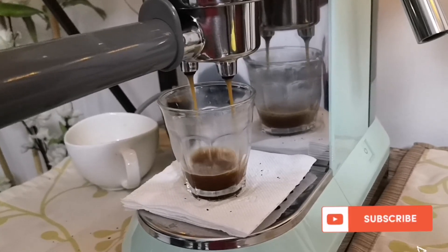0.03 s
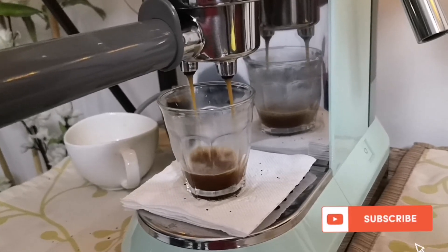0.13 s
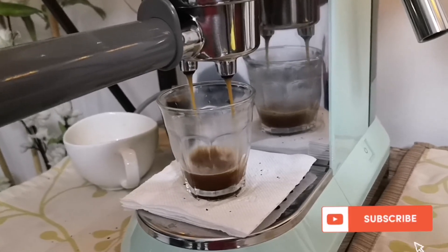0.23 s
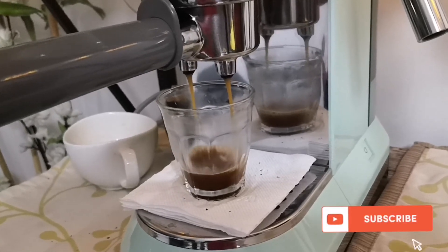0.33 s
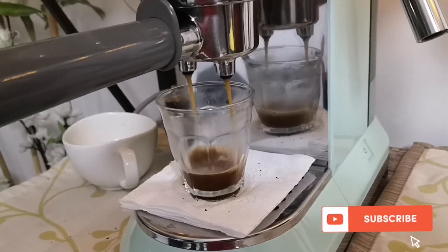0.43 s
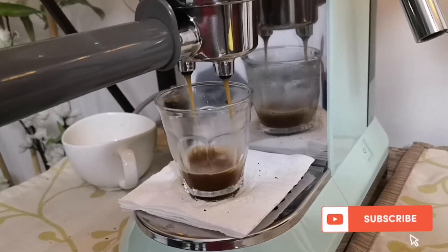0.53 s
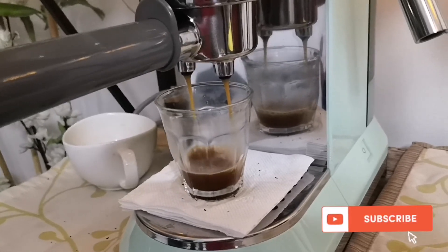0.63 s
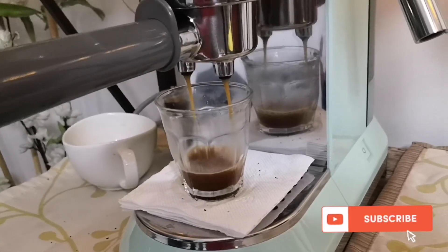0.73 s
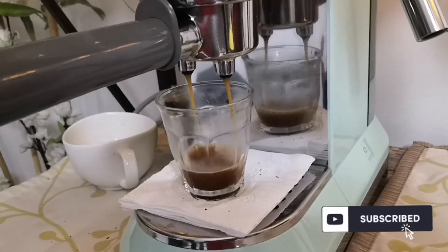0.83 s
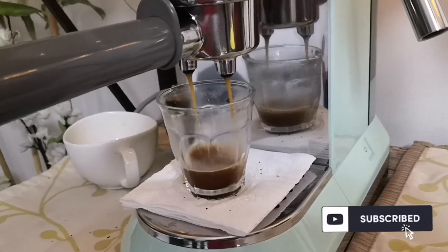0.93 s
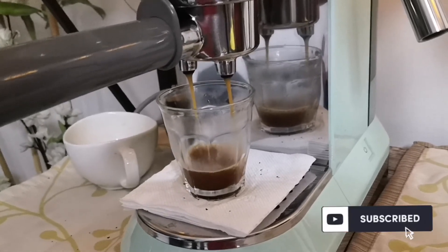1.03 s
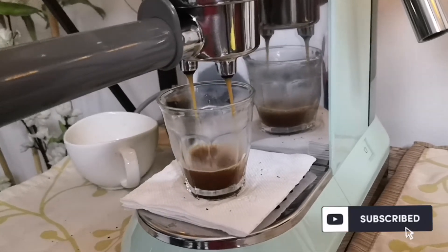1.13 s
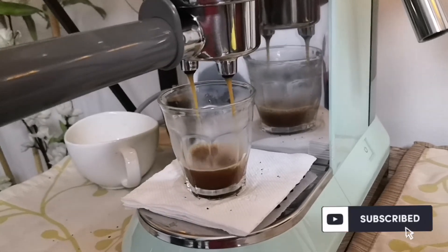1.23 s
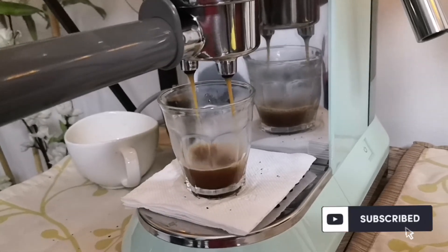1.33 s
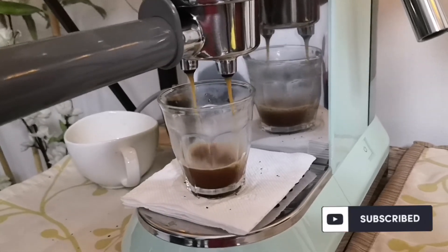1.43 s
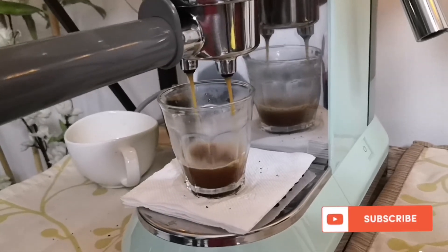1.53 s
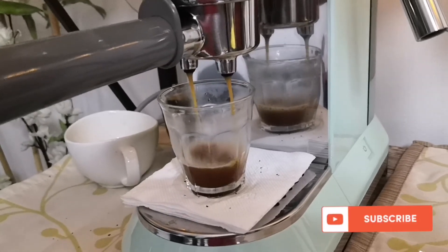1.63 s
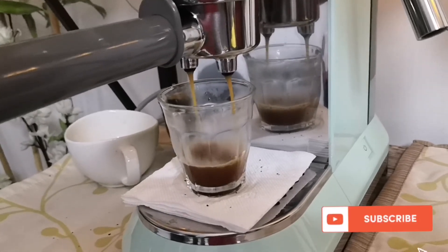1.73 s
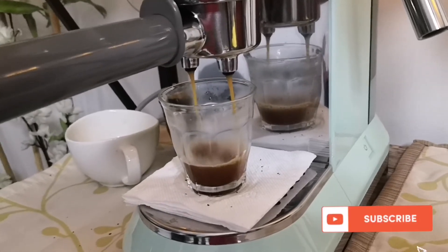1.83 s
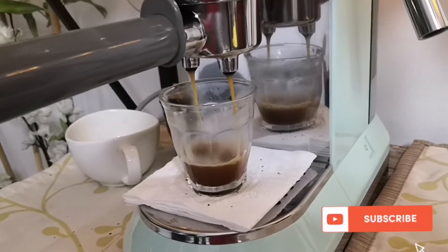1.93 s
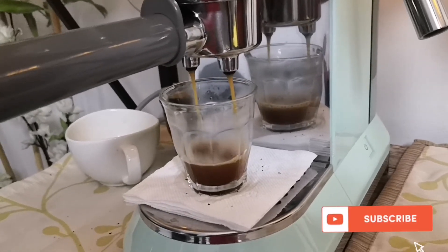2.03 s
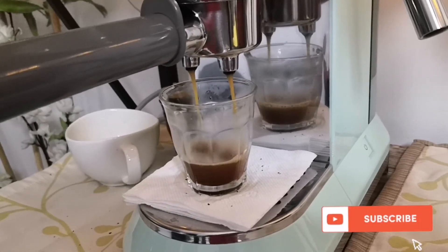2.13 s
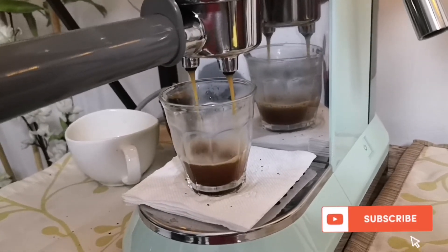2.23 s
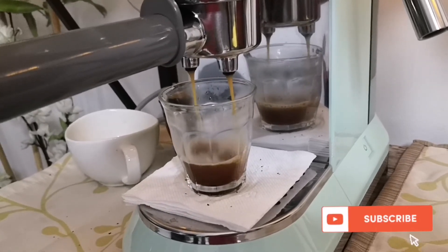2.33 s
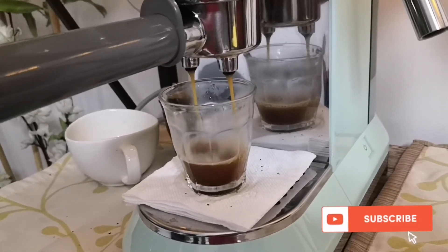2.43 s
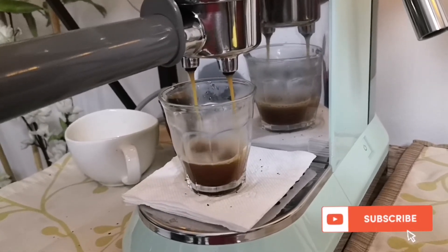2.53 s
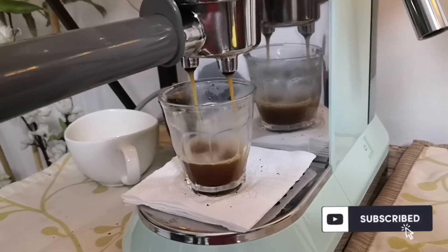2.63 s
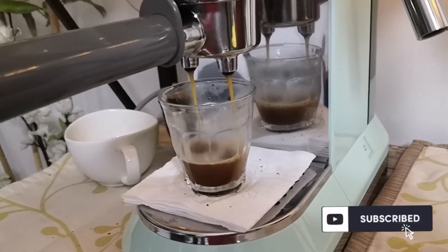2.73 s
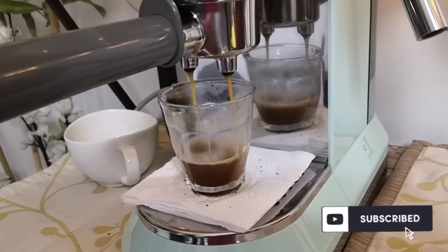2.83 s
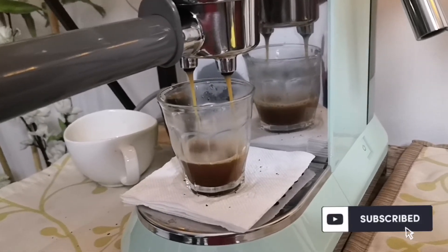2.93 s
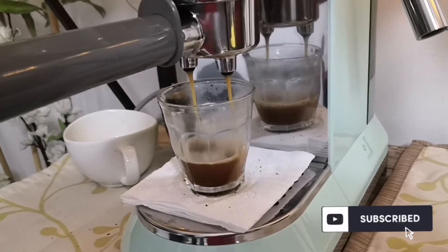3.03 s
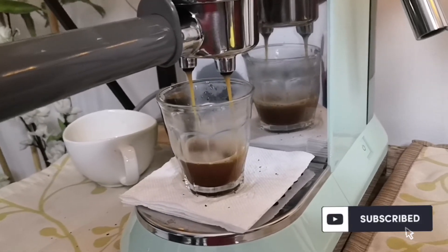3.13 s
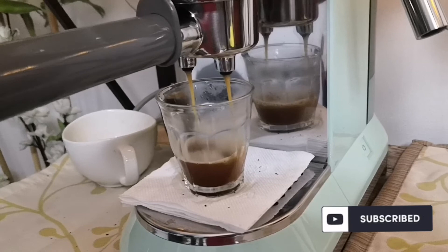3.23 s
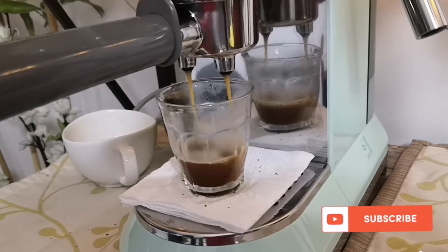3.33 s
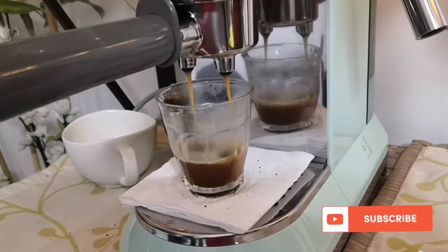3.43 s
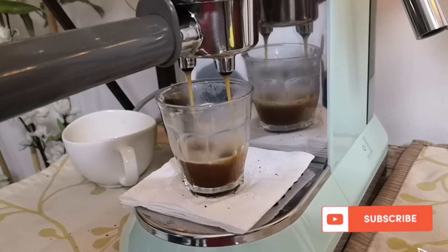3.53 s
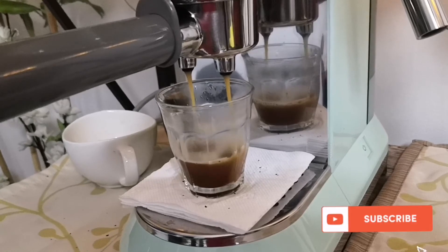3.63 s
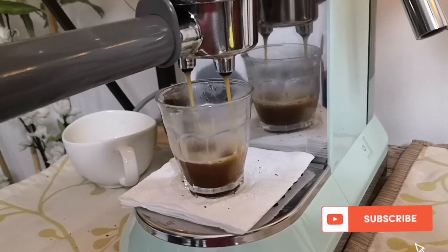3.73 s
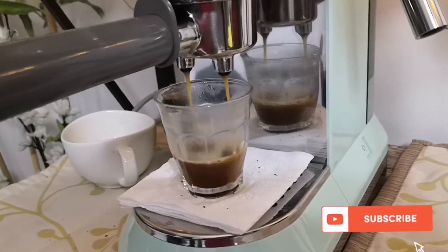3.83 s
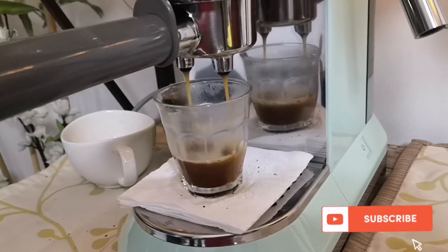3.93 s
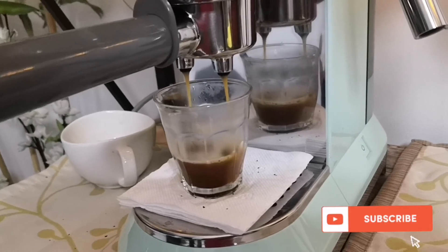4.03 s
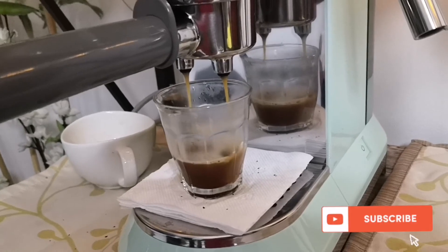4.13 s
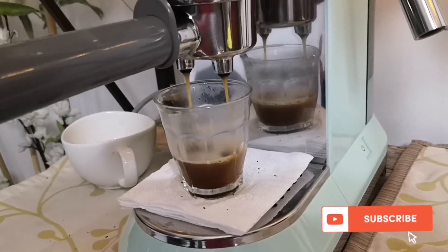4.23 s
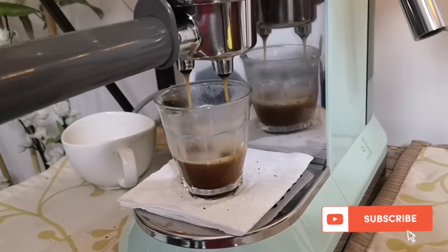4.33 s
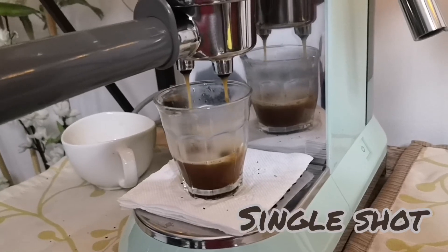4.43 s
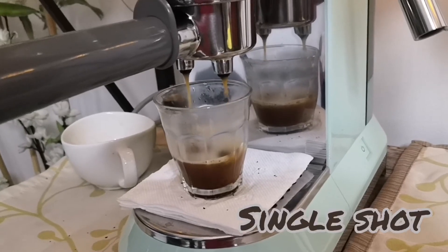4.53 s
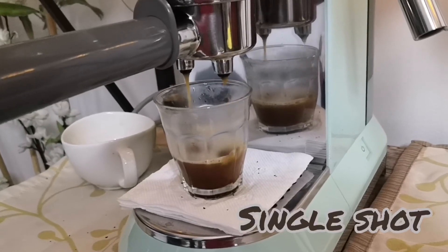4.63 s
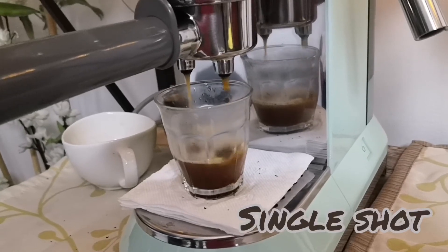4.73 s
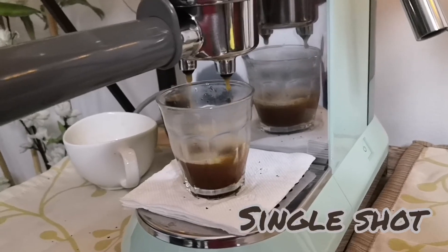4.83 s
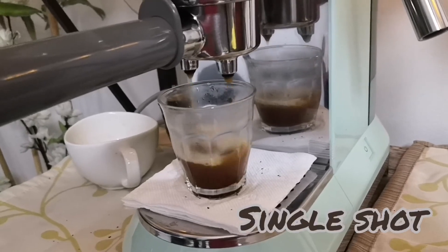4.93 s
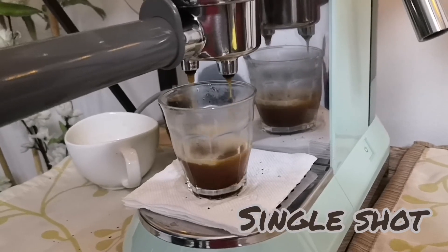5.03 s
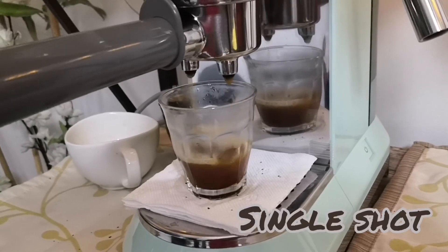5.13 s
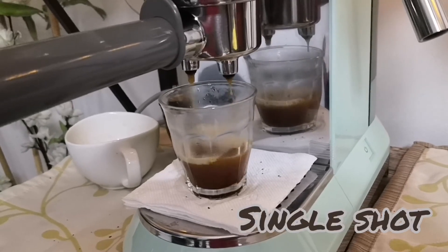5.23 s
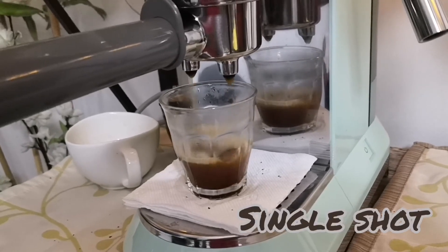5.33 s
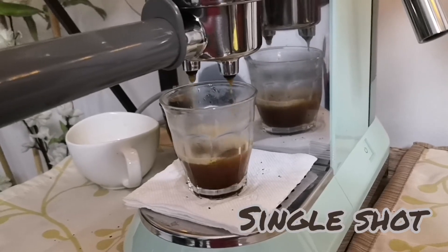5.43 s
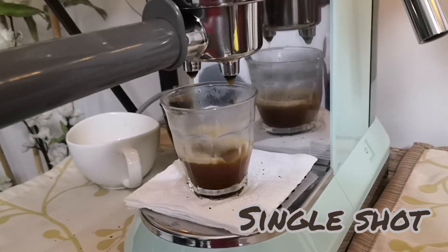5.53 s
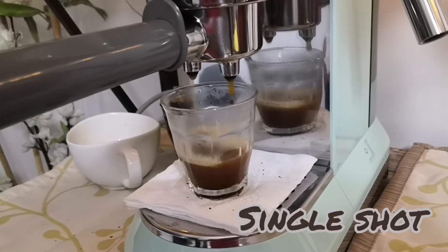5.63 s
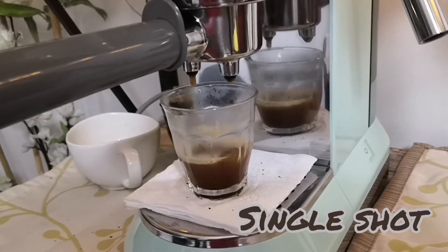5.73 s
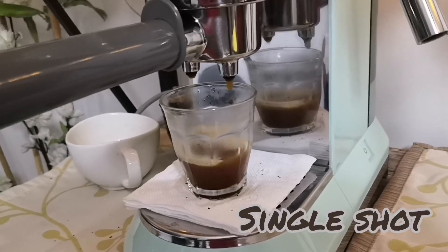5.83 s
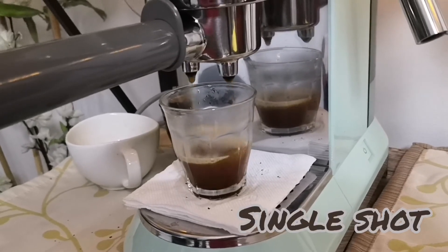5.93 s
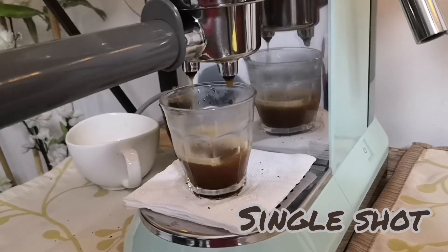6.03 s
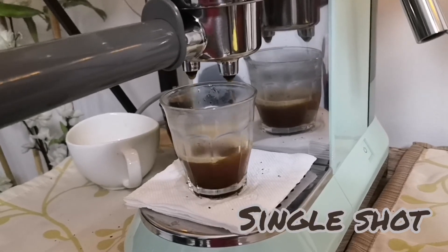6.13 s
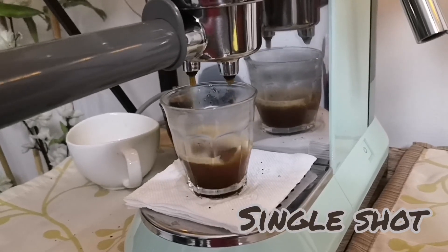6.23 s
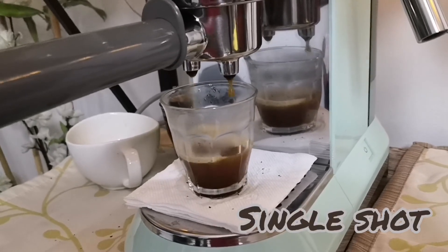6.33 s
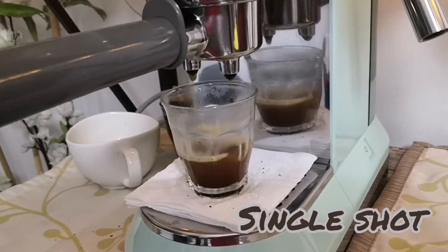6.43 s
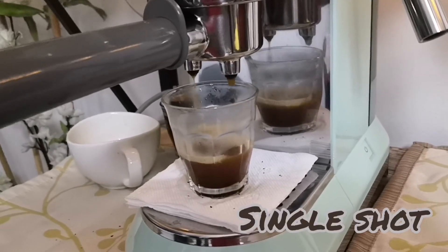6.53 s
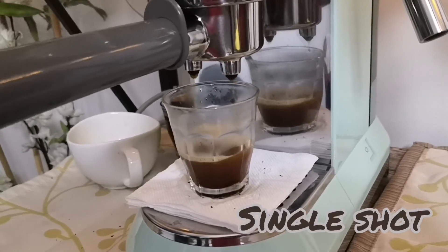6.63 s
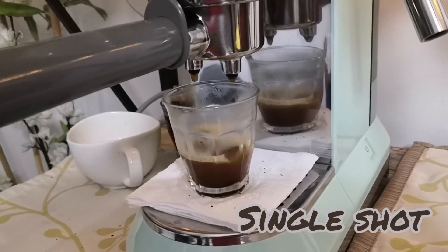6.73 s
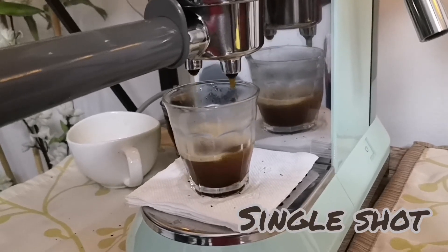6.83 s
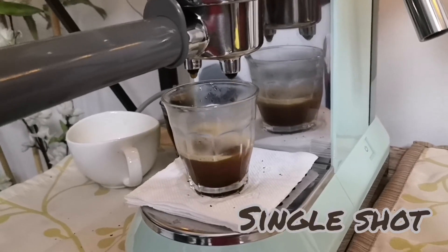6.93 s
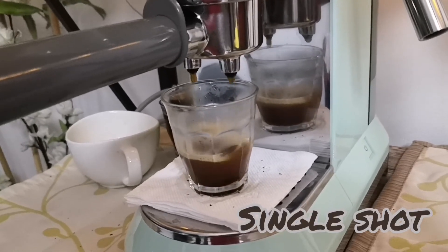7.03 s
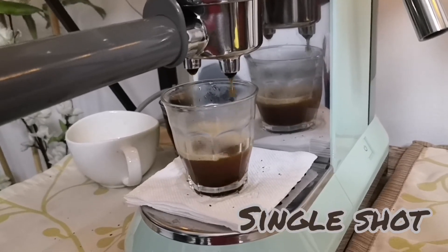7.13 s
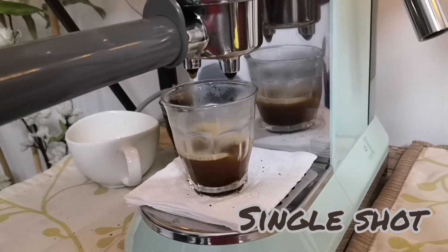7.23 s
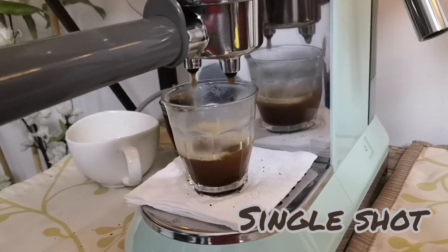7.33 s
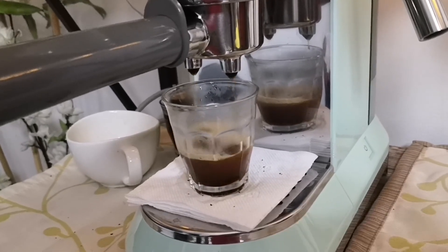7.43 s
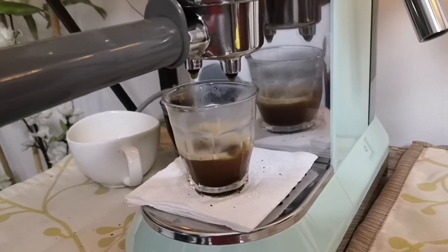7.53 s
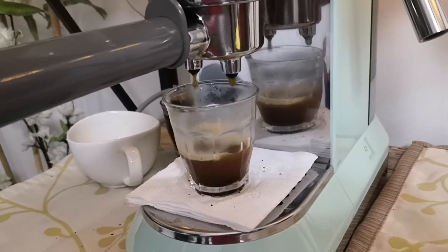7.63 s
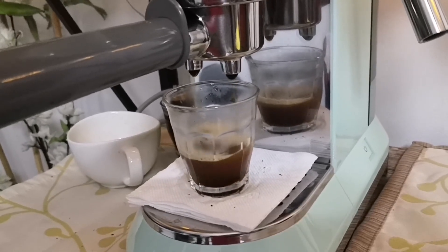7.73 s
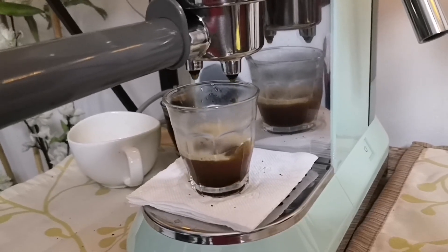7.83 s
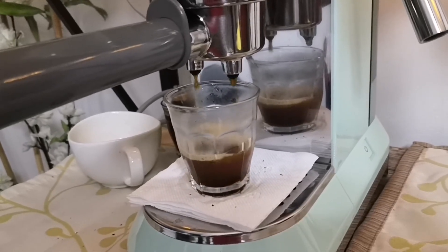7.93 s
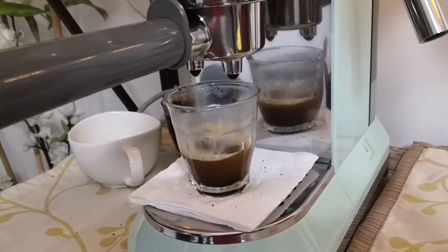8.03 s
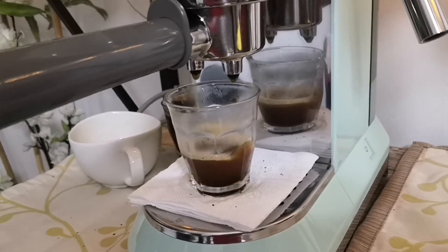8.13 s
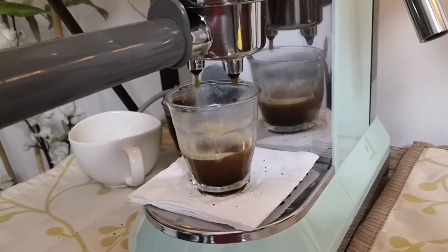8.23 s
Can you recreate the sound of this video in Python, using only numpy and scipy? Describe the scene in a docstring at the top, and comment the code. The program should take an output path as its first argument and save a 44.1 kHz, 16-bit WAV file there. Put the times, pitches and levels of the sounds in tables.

```python
"""An espresso machine pulls a shot in a kitchen: its vibrating pump hums and buzzes at the mains rate
as sums of stroke overtones, with noise for rattle and rushing water, then cuts out with a soft thump.
Coffee sputters in small wet ticks as the flow dies: ringing bubbles, splashes and dry cracks in a room tail.
Something is handled with soft rustles of shaped noise and brief squeaks of narrow-band noise.
The room rumbles quietly underneath as filtered noise; a stereo microphone with two ringing ports hears it all."""
import sys
import numpy as np
from scipy import signal
from scipy.fft import rfft, irfft, next_fast_len
from scipy.io import wavfile
from scipy.ndimage import uniform_filter1d, map_coordinates

SR = 44100
rng = np.random.default_rng(int(sys.argv[2]) if len(sys.argv) > 2 else 0)


def pcm_store(signal):
    """Save signal as 16-bit PCM."""
    levels = np.round(np.clip(np.atleast_2d(signal), -1, 1) * 32767)
    wavfile.write(sys.argv[1], SR, levels.astype(np.int16).T)


N = 365148
TIME = np.arange(N) / SR
MAINS_HZ = 60.06
STROKE_PHASE = 0.2  # cycles
STOP_S = 3.145  # the pump is switched off


def amp(db):
    """Decibels to gain."""
    return 10 ** (np.asarray(db) / 20)


def unit(x):
    """Scaled to rms 1."""
    return x / np.sqrt(np.mean(x ** 2) + 1e-20)


def along(points, hz):
    """(Hz, value) points read on a log frequency axis."""
    point_hz, value = np.transpose(points)
    return np.interp(np.log(hz + 1), np.log(point_hz), value)


def wobble(rate):
    """A smooth random curve with `rate` knots a second."""
    steps = np.arange(0, TIME[-1] * rate + 1, 1 / 10)
    curve = map_coordinates(rng.standard_normal(4096), [steps], mode="wrap")
    return np.interp(TIME * rate, steps, curve)


def filtered(x, response):
    """x times a response of frequency."""
    n = x.shape[-1]
    padded = next_fast_len(n + SR // 10)
    spectrum = rfft(x, padded) * response(np.fft.rfftfreq(padded, 1 / SR))
    return irfft(spectrum, padded)[..., :n]


def resonance(f, hz, width):
    """One causal resonance with peak gain 1; pitch and width in Hz."""
    return 1j * f * width / (hz * hz - f * f + 1j * f * width)


# Likeness of the left and right channels in diffuse sound: pitch_hz, likeness (0-1)
LEFT_RIGHT_LIKENESS = [(60, 0.99), (130, 1), (290, 0.77), (600, 0), (15000, 0.01)]


def noise(spectrum):
    """Diffuse stereo noise of rms 1, alike in the bass: mid and side share the power by likeness."""
    def mid_and_side(f):
        turn = np.arccos(np.clip(along(LEFT_RIGHT_LIKENESS, f), -1, 1)) / 2
        return amp(along(spectrum, f)) * [np.cos(turn), np.sin(turn)]

    mid, side = filtered(rng.standard_normal((2, N)), mid_and_side)
    return unit(np.array([mid + side, mid - side]))


def add(track, s, sound):
    """Mix a sound into a track at time s."""
    part = track[..., round(s * SR):][..., :sound.shape[-1]]
    part += sound[..., :part.shape[-1]]


def swell(start, length, rise, t60, linger_db=-13, linger_t60=0.86):
    """A smooth rise, a hold, a quick fade and a weaker one that lingers in the room; times in s."""
    t = TIME - start
    after = np.clip(t - length, 0, 2)
    fade_db = np.maximum(-60 * after / t60, linger_db - 60 * after / linger_t60)
    return (1 + np.tanh(2 * t / rise - 1 / 2)) / 2 * amp(fade_db)


# Colour of the room's rumble and faint hiss: pitch_hz, relative level_db (per Hz)
KITCHEN_COLOUR = [(22, -9), (36, -8), (78, -2), (100, -19.5), (135, -1.5), (220, -5.5), (460, -17.5),
                  (700, -17.5), (960, -14), (1250, -17), (2500, -17.5), (3300, -29), (7500, -35),
                  (11000, -47)]


def kitchen(floor_db=-54.0, settle_db=-1.22):
    """The room's diffuse rumble and faint hiss, easing slightly in level from 5.7 to 6.5 s."""
    drift_db = 0.4 * wobble(3)
    settling_db = np.interp(TIME, [5.7, 6.5], [0, settle_db])
    return amp(floor_db + settling_db + drift_db) * noise(KITCHEN_COLOUR)


def patches(x, depth_db):
    """Random swells of colour, a few hundred hertz wide and some tens of milliseconds long."""
    z = signal.stft(x, nperseg=512)[2]
    field = rng.standard_normal(z.shape[1:])
    for _ in range(2):
        across_pitch = uniform_filter1d(field, size=5, axis=0)
        field = uniform_filter1d(across_pitch, size=6, axis=1)
    return unit(signal.istft(z * amp(depth_db * unit(field)), nperseg=512)[1][:, :N])


def stroke(start, length, rise_share=0.16, t60=0.41, arch_db_per_s=35):
    """One rub: it presses hardest half way, the more so the longer it lasts."""
    way = np.clip((TIME - start) / length, 0, 1)
    arch_db = arch_db_per_s * length * (1 / 2 - (2 * way - 1) ** 2)
    return swell(start, length, rise_share * length, t60) * amp(arch_db)


# Soft rubs, levels before the arch of each rub and the flutter:
# start_s, length_s, body_level_db, hiss_level_db, air_level_db
RUBS = [(0.047, 0.18, -58.5, -62.5, -91), (0.635, 0.011, -64, -49.5, -76),
        (0.953, 0.051, -52, -53.5, -69.5), (1.21, 0.3, -60, -66.5, -89), (1.815, 0.014, -55, -57, -62.5),
        (3.098, 0.027, -58, -56.5, -70), (4.104, 0.056, -64, -62, -65), (4.2, 0.2, -68, -69, -81),
        (4.707, 0.077, -61.5, -59, -73), (4.828, 0.027, -58.5, -75, -88), (4.882, 0.016, -54.5, -51, -73),
        (4.933, 0.012, -53.5, -53.5, -75), (5.045, 0.083, -67.5, -67.5, -70),
        (5.253, 0.093, -49.5, -54, -60.5), (5.45, 0.079, -59, -62.5, -87), (5.527, 0.12, -54.5, -53.5, -60),
        (5.647, 0.017, -48.5, -56.5, -62), (5.709, 0.011, -56, -54.5, -76), (5.797, 0.008, -71, -57.5, -67),
        (5.842, 0.14, -57.5, -56.5, -59.5), (6.341, 0.01, -74, -65.5, -73), (6.374, 0.081, -59, -55.5, -59),
        (6.527, 0.016, -55.5, -55, -65), (7.126, 0.13, -69, -74.5, -92), (7.457, 0.026, -61.5, -62, -77),
        (7.598, 0.017, -51, -51.5, -63), (8.119, 0.0088, -69, -61.5, -82), (8.175, 0.014, -59, -65, -80)]
# Colours of the rubs' three parts, low to high: pitch_hz, relative level_db (per Hz)
RUB_BODY = [(60, -18), (170, 5), (450, -10.5), (940, -10.5), (1600, -5), (2300, -2), (3300, -3.5),
            (5000, -9.5), (9000, -31.5)]
RUB_HISS = [(1500, -37), (3500, -18), (5000, 0), (6600, -1), (7600, 4), (8400, -9), (10000, -11),
            (15000, -59)]
RUB_AIR = [(5000, -31), (8000, 2.5), (9500, 3.5), (11500, -4), (15000, -13)]


def rustles(grain_db=1.1, flutter_db=1.55, patchy_db=2.3):
    """Soft, grainy rubs of body, hiss and air noise; long ones swell in, short ones start abruptly."""
    power = np.zeros((3, N))
    for start, length, *levels_db in RUBS:
        power += np.outer(amp(levels_db), stroke(start, length)) ** 2
    rub = np.zeros((2, N))
    for level, colour in zip(np.sqrt(power), (RUB_BODY, RUB_HISS, RUB_AIR)):
        rub += level * patches(noise(colour), patchy_db)
    return rub * amp(grain_db * wobble(350) + flutter_db * wobble(50))


# Squeaks within the rustles: start_s, pitch_hz, level_db, length_s (before the fade), width (share of pitch)
SQUEAK_EVENTS = [(0.901, 3200, -56, 0.025, .012), (0.96, 5920, -52, 0.07, 0.11),
                 (1.816, 5704, -55, 0.045, 0.067), (3.096, 4950, -53.5, 0.044, 0.19),
                 (3.355, 3680, -59, 0.089, 0.068), (3.627, 4730, -51.5, 0.012, 0.21),
                 (4.882, 9100, -52, 0.0078, .1), (5.3, 2550, -67, .3, 0.046),
                 (5.71, 8440, -54, 0.011, 0.13), (6.524, 7850, -50.5, 0.033, 0.19),
                 (7.569, 5050, -54.5, 0.066, 0.065)]


def squeaks():
    """Brief whistles, some pure, some coarse: narrow-band noise keeps its wavering pitch, not its level."""
    out = np.zeros((2, N))
    for start, hz, db, length, width in SQUEAK_EVENTS:
        band = filtered(rng.standard_normal((2, SR // 2)), lambda f: resonance(f, hz, width * hz) ** 2)
        level_tone = np.cos(np.angle(signal.hilbert(band)))
        whistle = np.zeros((2, N))
        add(whistle, start - 0.01, unit(level_tone))
        out += amp(db) * whistle * swell(start, length, rise=0.0026, t60=0.22, linger_db=-17.5)
    return out


def bubble(hz, t60=0.017, attack=0.00079, glide_per_s=5, splash_db=-9, splash_t60=0.015, splash_width_hz=2300):
    """A drop's broad splash opens a small cavity that rings briefly, rising in pitch; the ring has peak 1."""
    t = np.arange(SR // 25) / SR
    life = t60 * np.exp(0.28 * rng.standard_normal())
    onset = (1 - np.exp(-t / attack)) ** 2
    ring = np.sin(2 * np.pi * hz * t * (1 + glide_per_s * t / 2)) * onset * amp(-60 * t / life)
    splash = unit(filtered(rng.standard_normal(len(t)), lambda f: resonance(f, hz, splash_width_hz) ** 2))
    splash_fade = np.sqrt(onset) * amp(splash_db - 60 * t / splash_t60)
    return ring / np.abs(ring).max() + splash * splash_fade


# Colour of the dry cracks: pitch_hz, relative level_db (per Hz)
SNAP_COLOUR = [(500, -24), (1000, 7), (2600, -3), (3600, 1.5), (7400, 2), (8600, -12), (13000, -14)]


def snap(hz, width_hz=2300, broad=0.21, t60=0.014, attack=0.0002):
    """A film of coffee bursts: a dry crack of noise, strengthened around its own pitch."""
    t = np.arange(SR // 25) / SR

    def colour(f):
        return amp(along(SNAP_COLOUR, f)) * (broad + abs(resonance(f, hz, width_hz)) ** 2)

    burst = (1 - np.exp(-t / attack)) * amp(-60 * t / t60)
    return unit(filtered(rng.standard_normal(len(t)), colour)) * burst / burst.max()


# Decay of the kitchen's echo: pitch_hz, t60_s
ROOM_DECAY = [(200, 0.14), (2000, 0.33), (8000, 0.26), (15000, 0.011)]


def room_tail():
    """A stereo room answer, left energy 1: decaying noise whose highest treble dies first."""
    hz, t, z = signal.stft(rng.standard_normal((2, SR // 3)), SR, nperseg=256)
    decay_db = -60 * t / along(ROOM_DECAY, hz)[:, None]
    tail = signal.istft(z * amp(decay_db), SR, nperseg=256)[1]
    return tail / np.linalg.norm(tail[0])


def tick(ring, crack, ring_wet_db=-8, crack_wet_db=-10, lag_s=0.00064, pan_db=6.5, snap_left_db=2):
    """One wet tick in the room: its crack lies a little to the left, its ring on the right."""
    sent = amp(ring_wet_db) * ring + amp(crack_wet_db) * crack
    sound = signal.fftconvolve(sent[None], room_tail(), axes=1)
    add(sound[0], 0, amp(-pan_db) * ring + amp(snap_left_db) * crack)
    add(sound[1], lag_s, amp(pan_db / 2) * ring + crack)
    return sound


# The clearest wet ticks, levels before panning: start_s, bubble_peak_db, snap_level_db, snap_pitch_hz
CLEAR_TICKS = [(0.103, -48, -39.5, 6160), (0.2212, -54, -42, 6030), (0.2391, -51, -36, 5800),
               (0.625, -54, -46, 5900), (0.6712, -31.5, -46, 6050), (0.9153, -48, -39.5, 3570),
               (1.9914, -29.5, -51, 6200), (2.0572, -46, -40, 3450), (2.0819, -36, -41, 4540),
               (2.1328, -41, -34, 5700), (2.194, -29.5, -52, 7380), (2.5825, -32, -37.5, 3400),
               (2.7825, -40, -40.5, 6400), (2.7951, -35, -60, 4000), (2.9125, -31, -41.5, 3940),
               (2.9477, -32, -44, 4690), (3.0076, -31.5, -58, 3040), (3.0184, -34.5, -53, 3360),
               (3.0657, -31.5, -41.5, 4740), (3.087, -32, -56, 4930), (3.11, -33, -50, 4690),
               (3.1448, -34.5, -56, 4830), (3.2882, -43.5, -46.5, 6900), (3.3277, -41, -55, 7650),
               (3.3578, -39, -57, 3710), (3.4088, -36, -53, 3700), (3.442, -28.5, -43.5, 3800),
               (3.564, -38.5, -57, 4720), (3.608, -39, -57, 4750), (3.7225, -40, -51, 6020),
               (3.771, -43, -50.5, 7240), (3.8045, -41, -61, 7790), (3.8528, -41, -43.5, 3240),
               (3.8586, -37.5, -42, 5650), (3.913, -44, -49.5, 7450), (3.9332, -39, -44.5, 3440),
               (4.1418, -39.5, -63, 7510), (4.235, -52, -51, 6300), (4.2835, -40, -63, 7530),
               (4.3235, -47, -55, 3500), (4.37, -44, -70, 3520), (4.4776, -37, -57, 3070),
               (4.619, -40, -56, 3080), (4.6815, -44, -59, 3140)]
# The bubbles' central pitch drifts with the flow into the glass: time_s, pitch_hz
BUBBLE_DRIFT = [(.67, 1920), (2.15, 1906), (2.6, 1800), (3.4, 1797), (3.75, 1776), (4.5, 1860)]


def coffee(count=44, spit_bubble_db=-49, spit_snap_db=-57, drip_bubble_db=-55.5, drip_snap_db=-73,
           range_db=11, snap_hz=6200, pitch_scatter=0.029):
    """Clear ticks, faint spits in step with the piston, and a faint dribble as the flow dies."""
    ticks = list(CLEAR_TICKS)
    for spit, drip, size in rng.random((count, 3)):
        cycle_number = np.floor(STOP_S * spit * MAINS_HZ)
        spit_s = (cycle_number + STROKE_PHASE / 2) / MAINS_HZ
        drip_s = 2.85 + 1.55 * drip
        louder_db = range_db * size
        ticks.append((spit_s, spit_bubble_db, spit_snap_db + louder_db, snap_hz))
        ticks.append((drip_s, drip_bubble_db + louder_db, drip_snap_db + louder_db, snap_hz))
    out = np.zeros((2, N))
    for s, bubble_db, snap_db, crack_hz in ticks:
        central_hz = np.interp(s, *np.transpose(BUBBLE_DRIFT))
        hz = central_hz * (1 + pitch_scatter * rng.standard_normal())
        add(out, s, tick(amp(bubble_db) * bubble(hz), amp(snap_db) * snap(crack_hz)))
    return out


# The machine's body has its own mode
BODY_MODE_HZ, BODY_MODE_T60_S = 245, 0.33


def thump(rest_s=3.204, level_db=-37.5, t60=0.06):
    """The piston comes to rest with a soft knock: a decaying tone at the body's mode."""
    t = np.maximum(TIME - rest_s, 0)
    onset = np.tanh(BODY_MODE_HZ * t)
    return amp(level_db - 60 * t / t60) * np.sin(2 * np.pi * BODY_MODE_HZ * t) * onset


# The pump's effort while it runs: time_s, level_db
PUMP_EFFORT = [(0, -1), (1.0, -1.5), (1.7, -2), (2.4, -0.5), (3.1, 0)]


def running(t60):
    """The pump's strength: its effort until the switch-off, then a steady decay."""
    effort_db = np.interp(TIME, *np.transpose(PUMP_EFFORT))
    return amp(effort_db - 60 * np.clip(TIME - STOP_S, 0, 1) / t60)


def overtone(k, cycle, phase, spread=0.023):
    """One multiple of the stroke rate at rms 1; the higher ones lead more in phase on the left."""
    lead = min(spread * k * k, 1) / 2 * np.array([[1], [-1]])
    return np.sqrt(2) * np.cos(2 * np.pi * k * cycle + phase + lead)


# Low sway of the machine's body, before the pump's gain and effort: multiple (of the mains), level_db (rms)
BODY_SWAY = [(1, -53), (2, -48.5), (3, -58.5), (4, -47), (5, -46), (6, -51), (7, -55.5)]


def hum(cycle, waver_db=0.72, dispersion=0.96, sway_t60=0.13):
    """The heavy body spreads its low orders over the cycle; the one nearest its mode outlasts the others."""
    out = 0
    for k, db in BODY_SWAY:
        near_mode = abs(resonance(k * MAINS_HZ, BODY_MODE_HZ, MAINS_HZ)) ** 2
        life = sway_t60 + (BODY_MODE_T60_S - sway_t60) * near_mode
        level = running(life) * amp(db + waver_db * wobble(8.16))
        out = out + level * overtone(k, cycle, dispersion * k ** 2)
    return out


# Housing panels that pick out the buzz, before the pump's gain and effort:
# pitch_hz, width_hz, level_db (rms of a multiple at the centre)
HOUSING_PANELS = [(715, 250, -64.5), (906, 110, -60.5), (1218.5, 38, -61.5), (1394.3, 28.5, -58.5),
                  (1542.3, 35.6, -55), (1820, 94, -67.5), (2368, 56, -57.5), (2643, 35, -66)]


def buzz(cycle, waver_db=1.6, order=8, count=52, floor_db=-78.5, fall_db_per_octave=8,
         spread_rad=6.017, scatter_rad=0.45):
    """Higher orders start with the stroke and sound where the panels resonate, each wavering by itself."""
    out = np.zeros((2, N))
    for k in range(order, count):
        panels = [amp(db) * abs(resonance(k * MAINS_HZ, hz, width)) ** 2 for hz, width, db in HOUSING_PANELS]
        # the stroke's own buzz between the resonances
        own = amp(floor_db - fall_db_per_octave * np.log2(k / order))
        gain = np.linalg.norm(panels + [own])
        level = gain * amp(waver_db * wobble(7.51))
        # bending waves cross the panels more slowly at low pitch
        phase = scatter_rad * rng.standard_normal() - spread_rad * np.sqrt(k)
        out += level * overtone(k, cycle, phase)
    return out


# Colour of the rushing water: pitch_hz, relative level_db (per Hz)
WATER_COLOUR = [(60, -12), (140, 3.5), (250, -0.5), (480, -14.5), (1000, -8.5), (1500, -8.5), (2400, -9),
                (3300, -17.5), (4500, -18.5), (7000, -17), (8500, -26), (15000, -44.5)]


def pump(hum_db=1.0, buzz_db=1, water_db=-48.5, rattle_db=-61, rattle_decay=0.77, surge_db=2.5, run_down_t60=0.073):
    """Each piston stroke shakes the housing, rattles it and pushes hissing water."""
    cycle = MAINS_HZ * TIME - STROKE_PHASE + 0.012 * wobble(1.4)
    gate = np.exp(-(cycle % 1) / rattle_decay)  # decay in cycles
    rattle_colour = [(400, -53), (850, 16), (1300, -16), (2000, 11), (2500, 6), (3200, 0.0),
                     (7000, -21), (12000, -45)]  # pitch_hz, relative level_db
    rattle = unit(gate * noise(rattle_colour))
    flow_db = 0.7 * wobble(3) + 1.2 * wobble(40)
    water = noise(WATER_COLOUR) * amp(flow_db + surge_db * (gate - gate.mean()))
    rasp = amp(buzz_db) * buzz(cycle) + amp(rattle_db) * rattle + amp(water_db) * water
    return amp(hum_db) * hum(cycle) + running(run_down_t60) * rasp


def scene():
    """The room, the handling, the coffee and the machine together."""
    return kitchen() + rustles() + squeaks() + coffee() + thump() + pump()


def record(dry, left_hz=7450, right_hz=9100, port_width_hz=1000, left_boost=1, right_boost=0.088, top_hz=15600):
    """Each microphone port rings at its own treble pitch; nothing passes above the band limit."""
    def response(f):
        left = left_boost * resonance(f, left_hz, port_width_hz)
        right = right_boost * resonance(f, right_hz, port_width_hz)
        return (1 + np.array([left, right])) * (f < top_hz)

    return filtered(dry, response)


dry = scene()
out = record(dry)
pcm_store(out)
```